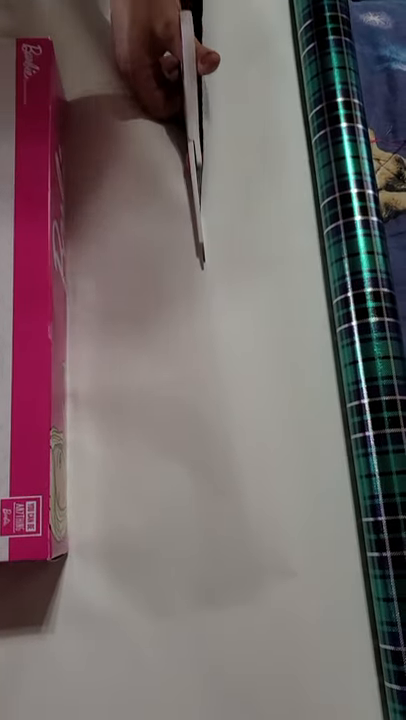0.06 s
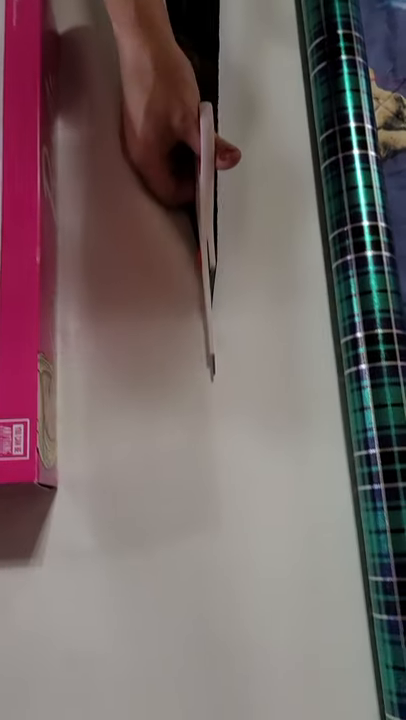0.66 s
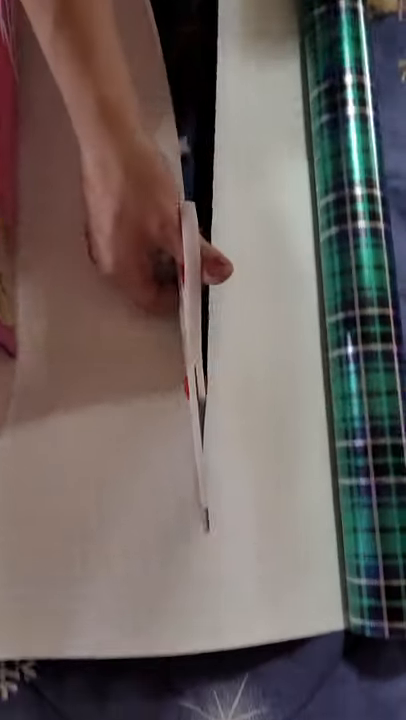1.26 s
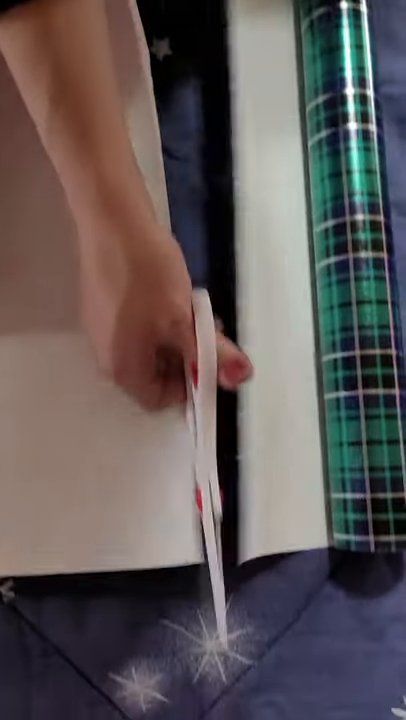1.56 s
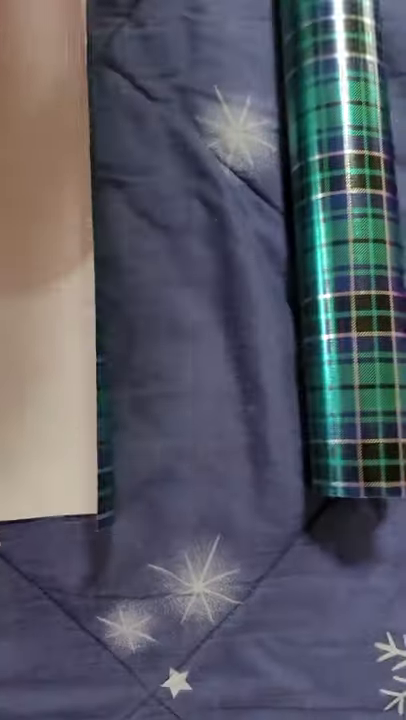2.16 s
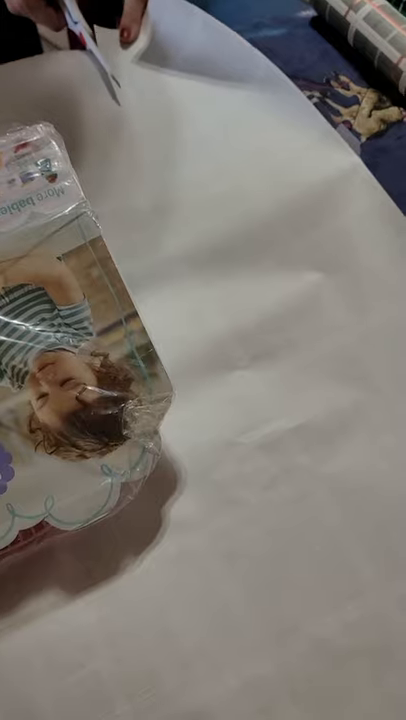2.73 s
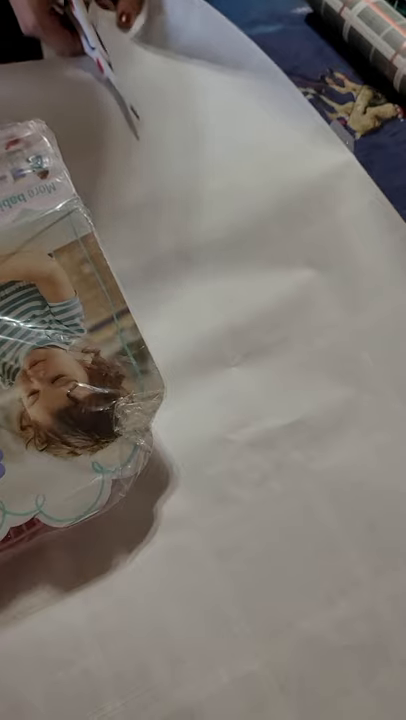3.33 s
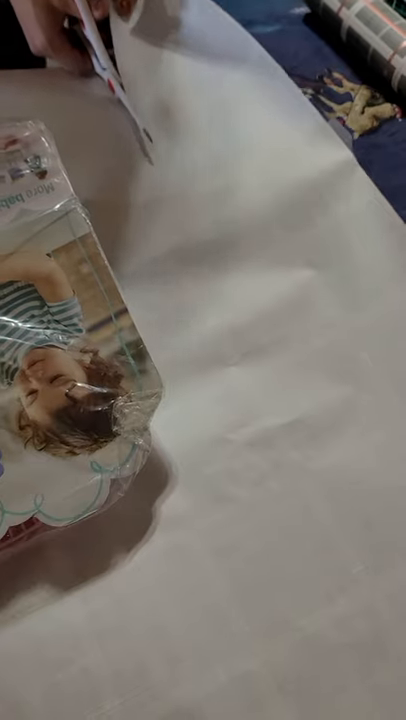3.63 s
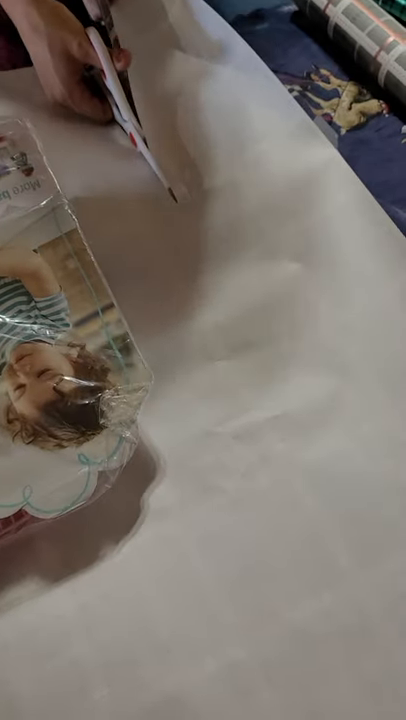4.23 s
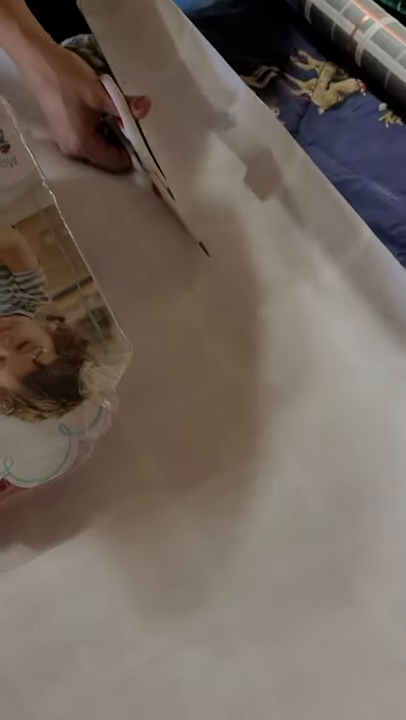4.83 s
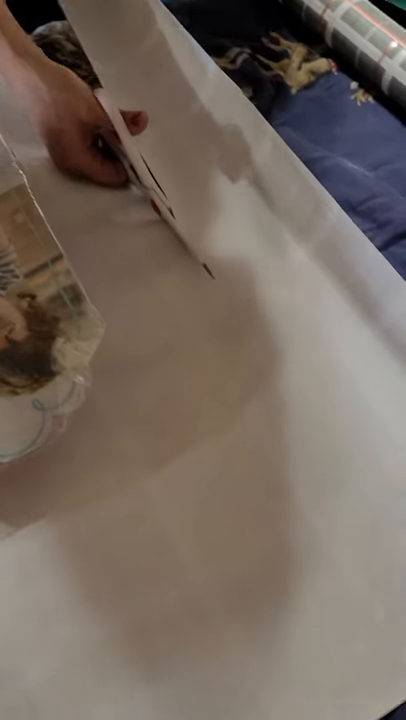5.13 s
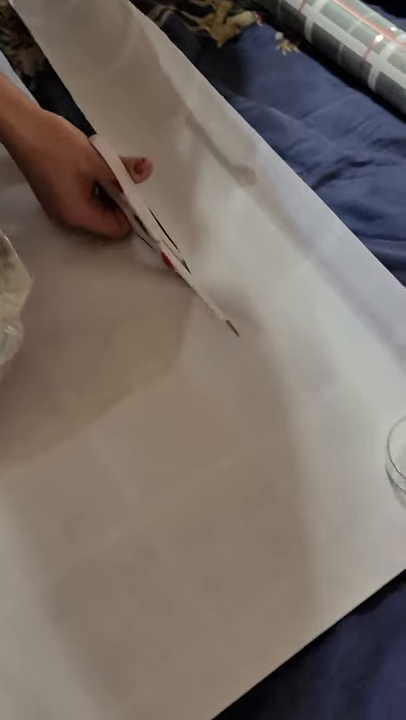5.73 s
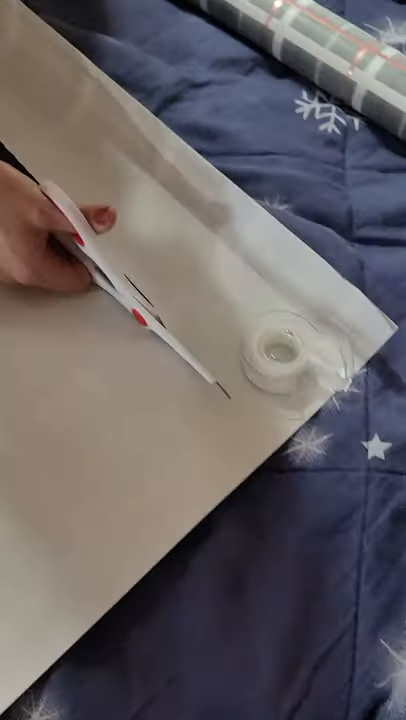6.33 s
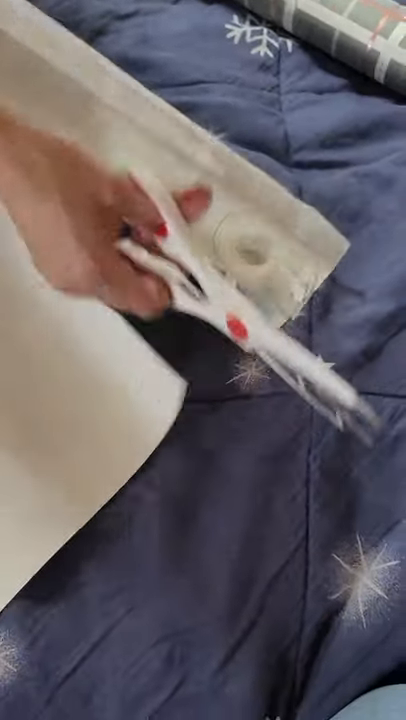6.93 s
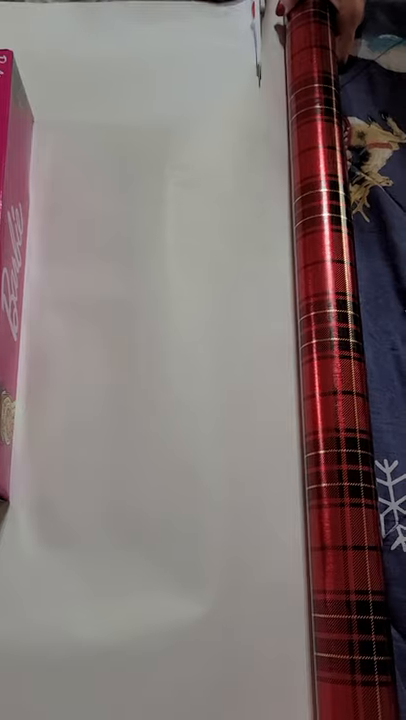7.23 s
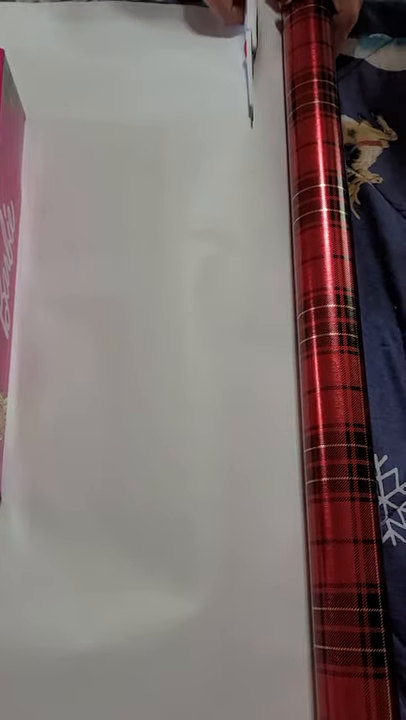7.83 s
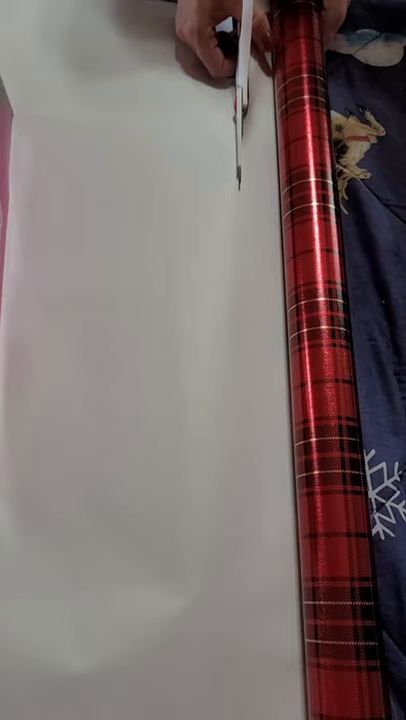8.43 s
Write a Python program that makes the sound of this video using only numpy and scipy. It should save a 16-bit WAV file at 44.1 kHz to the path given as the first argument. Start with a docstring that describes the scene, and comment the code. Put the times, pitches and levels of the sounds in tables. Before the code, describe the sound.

Half-open scissors glide through wrapping paper, heard close in a small quiet room. The first hissing cut grows louder and stops abruptly. After a pause with faint blade ticks, a softer, longer cut snags halfway with sharp clicks and a crackle, then runs on and ends in a clack. The loose paper flaps and slides briefly, and another soft, duller cut begins.

```python
"""Half-open scissors glide through wrapping paper on a quilt in a small quiet room: three long cuts,
the second snagging halfway. The blades snap thousands of fibres a second; the sheet radiates them over
short paths that shift as the scissors travel, so the hiss slowly swirls. Around the cuts the blades clack
and the loose paper slides and flaps; underneath lie a soft rumble of the hand and the room tone."""
import sys
import numpy as np
from scipy import signal
from scipy.fft import rfft, irfft, next_fast_len
from scipy.io import wavfile
from scipy.ndimage import uniform_filter1d

SR = 44100
rng = np.random.default_rng(int(sys.argv[2]) if len(sys.argv) > 2 else 0)


def master(y):
    """Save y as 16-bit WAV."""
    cut = np.clip(np.atleast_2d(y).T, -1, 1)
    pcm = np.round(cut * 32767)  # scale
    wavfile.write(sys.argv[1], SR, pcm.astype(np.int16))


N = 382328

# glides of the scissors, the snag splitting the second cut in two: start_s, end_s
GLIDES = [(0.0, 1.566), (2.531, 4.832), (4.828, 6.671), (7.123, 8.78)]
# push of the hand through each glide, as the level of the sheet: time_s, level_db
PUSH_1 = [(0.0, -34), (0.966, -31), (1.07, -27.5), (1.525, -27.5), (1.55, -25.5)]
PUSH_2 = [(2.55, -39), (2.79, -42.4), (2.92, -40), (3.09, -40.5), (3.49, -42), (3.8, -43.5), (4.04, -42.5),
          (4.2, -40.9), (4.689, -41)]
PUSH_3 = [(4.93, -37.5), (5.38, -38.7), (5.51, -37), (5.86, -36), (6.22, -34.5), (6.34, -32.2), (6.53, -33),
          (6.65, -32.5)]
PUSH_4 = [(7.15, -45), (7.246, -41), (7.356, -44.1), (7.986, -38), (8.66, -37.1)]
# tone colour of the sheet in each glide: frequency_hz, gain_db
SHEET_1 = [(100, -21.5), (280, -23.5), (390, -13), (520, -9), (720, -3), (1020, -4.5), (1250, -1),
           (2300, -5.5), (3600, -3), (5000, -9.5), (7100, -10.5), (8000, -13), (9500, -19), (11400, -16.5),
           (15500, -26.5)]
SHEET_2 = [(100, -10), (190, -4.5), (290, -5.5), (420, -5), (680, 0), (1000, 3), (1350, 2), (2200, 0.5),
           (3300, 2), (4000, -2), (5000, -6), (7000, -6.5), (9500, -24.5), (11400, -25.5), (15500, -31)]
SHEET_3 = [(100, -49), (200, -3), (300, -8.5), (400, -5.5), (520, -4.5), (660, 0), (880, -1.5), (1300, 0.5),
           (1750, 2.5), (2300, 2.5), (3200, -1.5), (4200, -4), (6000, -6.5), (7200, -4.5), (8500, -3.5),
           (9700, -5), (12000, -6.5), (15500, -9)]
SHEET_4 = [(100, -8), (180, -25.5), (270, -13.5), (520, -13), (690, -6.5), (980, -2.5), (1280, 4),
           (1800, -0.5), (2200, -3.5), (2750, -8.5), (3800, -12.5), (4800, -16), (6300, -17.5), (9300, -11),
           (11400, -14), (15500, -18.5)]
# main resonance of the sheet in each glide: time_s, pitch_hz, boost_db, half_width_hz
RING_1 = [(0.0, 1560, 5, 380), (.55, 1410, 5, 350), (.85, 1380, 7, 280), (1.07, 1330, 6, 350),
          (1.25, 1440, 2, 450), (1.55, 1500, 3.5, 522)]
RING_2 = [(2.55, 1430, 5.9, 300), (2.8, 1390, 6.3, 230), (3.05, 1680, 8.5, 300), (3.45, 1690, 8.2, 260),
          (3.95, 1910, 1.5, 200), (4.55, 1760, 5.2, 150)]
RING_3 = [(4.85, 1450, 6.6, 330), (5.15, 1620, 5.5, 380), (5.35, 1170, 4.5, 180), (5.68, 1230, 4, 180),
          (5.88, 1370, 8.3, 190), (6.3, 1350, 8.2, 180), (6.54, 1340, 13.7, 180), (6.66, 1260, 8, 181)]
RING_4 = [(7.13, 1720, 9.7, 240), (7.6, 1630, 7.4, 260), (8.0, 1620, 6.1, 282), (8.66, 1320, 1.6, 330)]
# treble over the sheet's level, arching once and drifting in each glide:
# rasp_db, fizz_db, arch_db, rasp_drift_db, fizz_drift_db
TREBLE = [(-2.5, -8, -1, -2, 0), (-3.5, -10.5, 7.5, 3.5, 13), (-4, -8, 3, -0.5, 1), (-1, -10, -5, -2.5, -2)]
# direction of the scissors in each glide (positive pan is left):
# first_left_lead_ms, last_left_lead_ms, pan_db, midway_swing_db, extra_fizz_pan_db
AIM = [(-.06, .09, 1.5, -12, 0.5), (0.22, 0.17, 1, 0, 4.5), (.18, 0.15, -0.2, 3.5, 3.5),
       (0.2, 0.15, 3, -4.5, 0.5)]
# paper resonances by the blades: start_s, length_s, pitch_hz, sink_octaves_per_s, half_width_hz, boost_db
SWISHES = [(0.355, 0.81, 6330, 0.48, 620, 6), (0.715, 0.39, 7530, 0.64, 450, 9),
           (.92, 0.45, 14200, 1.2, 1000, 4), (1.02, 0.15, 5800, .4, 600, 6),
           (1.112, 0.42, 1930, -0.3, 560, 8), (2.864, 2.3, 2800, 0.26, 191, 6),
           (2.855, 0.61, 3320, 0.016, 280, 7), (2.848, 0.6, 4140, 0.15, 250, 4.5),
           (3.53, 0.385, 5170, 1.13, 500, 9.5), (3.448, 1.0, 6930, -0.024, 320, 6),
           (3.85, 0.47, 5760, 0.17, 400, 7.5), (3.948, 0.85, 8300, 0.14, 450, 0),
           (4.252, 0.25, 4220, 0.15, 197, 4.5), (4.255, 0.13, 687, -0.076, 80, 8.5),
           (4.424, 0.3, 2530, 0.31, 170, 3), (4.858, 0.76, 5550, -0.29, 330, 6),
           (5.42, 0.13, 2060, 0.078, 260, 6.5), (5.347, 0.99, 8600, 0.076, 550, 5),
           (5.628, 0.48, 630, 0.17, 111, 6), (5.637, 0.7, 2160, -0.16, 150, 6),
           (5.73, 0.92, 3040, -0.06, 300, 4.5), (6.274, 0.28, 2330, 0.36, 290, 9),
           (6.25, 0.74, 6000, 0.099, 450, 3), (7.088, 0.4, 3520, -0.4, 705, 5.5),
           (7.745, 1.1, 6600, 0.26, 930, 8.5)]
# blades knocking and catching: start_s, level_db, pitch_hz, t60_s, pan_db
CLACKS = [(2.086, -61, 6000, .02, 4), (2.137, -53, 2780, 0.023, 5), (2.355, -58, 4520, 0.018, 2),
          (4.7116, -21, 4600, 0.006, 7), (4.724, -18, 5100, 0.019, 0), (4.831, -17.5, 3100, 0.017, 4),
          (6.662, -25, 1590, 0.016, 1), (6.883, -39, 3150, 0.0049, -3), (6.92, -35.5, 4000, 0.018, 3),
          (7.549, -27.5, 2510, 0.0089, 1)]
# paper buckling and flapping: start_s, level_db, pitch_hz, t60_s, pan_db
FLAPS = [(1.01, -31, 630, 0.32, 2), (1.055, -21, 1090, 0.074, 2), (1.764, -55, 1000, 0.044, -5),
         (4.715, -33, 4970, 0.11, 4), (4.723, -31, 2180, 0.32, -6), (4.828, -25.5, 940, 0.022, 8),
         (4.839, -22.5, 2100, 0.019, 0), (6.804, -36.5, 1630, 0.068, 0), (6.847, -36, 1830, 0.054, 1),
         (6.873, -36, 1930, 0.04, -5), (6.918, -32.5, 1100, 0.04, 4)]
# freed paper sliding over the quilt: start_s, hold_s, level_db
SLIDES = [(1.564, 0.048, -47.5), (6.661, 0.0081, -35), (6.725, 0.26, -52.5), (6.84, 0.03, -48.5),
          (7.064, 0.034, -54)]
# tone colour of the sliding strip: frequency_hz, gain_db
STRIP_COLOUR = [(60, -11), (300, -4), (800, -3.5), (1100, -5), (1360, 6.5), (1700, 1), (3000, -3.5),
                (7000, -8), (10000, -14), (16000, -23)]
# the hand on the quilt: start_s, length_s, level_db, cutoff_hz
BUMPS = [(2.534, 4.1, -60.5, 99), (6.611, 0.123, -54, 34.7)]
# decay of the room: frequency_hz, t60_s
ROOM_T60 = [(200, 0.22), (1500, 0.34), (4000, 0.31), (14000, 0.048)]
# colour of the room tone: frequency_hz, gain_db
ROOM_COLOUR = [(12, -40.5), (20, -16.5), (86, 5), (130, -7), (146, -15.5), (210, -17), (499, -21.5),
               (698, -10), (873, -14.5), (1000, -26.5), (1660, -21), (2820, -31), (4400, -33),
               (16000, -39.5)]

FRAMES = dict(nperseg=1024, noverlap=768)
HZ = np.fft.rfftfreq(1024, 1 / SR)
CUT_ATTACK_S, CUT_RELEASE_S = 0.00041, 0.0049  # the blades bite at once and run out at the sheet's edge
SNAG_S, FREE_S, SNAG_DB, SNAG_EASE_S = 4.712, 4.85, 3.0, 0.05
FIZZ_ARCH, FIZZ_SNAG = 0.93, 0.23  # the fizz's share of the arch and its extra share of the snag
SHEET_SWING = 0.42  # share of the pan swing that the sheet's long waves follow


def scissor_glide(glide, colour, ring, clump_db):
    """Snapping fibres drive three bands: the body of the sheet, the blades' rasp and a fine fizz."""
    (start, end), push, treble, (first_ms, last_ms, pan_db, swing_db, fizz_pan_db) = glide
    rasp_db, fizz_db, arch_db, rasp_drift_db, fizz_drift_db = treble
    t = np.arange(start, end, 1 / SR)
    travel = (t - start) / (end - start)
    arch = np.sin(np.pi * travel)
    sheet_db = np.interp(t, *np.transpose(push)) + snag(t)
    rasp_db = rasp_db + arch_db * arch + rasp_drift_db * (travel - .5)
    fizz_db = fizz_db + FIZZ_ARCH * arch_db * arch + fizz_drift_db * (travel - .5) + FIZZ_SNAG * snag(t)
    snaps = fibres(len(t), per_s=5000, clump_db=clump_db, clump_hz=256, rub=0.4)
    rubbing = rng.standard_normal((2, len(t)))  # parted edges on the blades, different on each side
    _, frame_s, spectra = signal.stft(np.vstack([snaps, rubbing]), SR, **FRAMES)
    frame_s, hz = frame_s + start, HZ[:, None]
    lead_ms = first_ms + (last_ms - first_ms) * np.interp(frame_s, t, travel)
    drive = spectra[0] + spectra[1:] * hz / (hz + 900)
    swirl = drive * sheet_paths(frame_s, lead_ms) * bending_waves(frame_s, hz)
    paper = swirl * sheet_tone(frame_s, hz, colour, ring)
    below_rasp, below_fizz = 1 / (1 + (hz / 2600) ** 10), 1 / (1 + (hz / 8000) ** 20)
    # the shorter the waves, the more the far microphone is shaded
    bands = [(below_rasp, sheet_db, pan_db + SHEET_SWING * swing_db * arch),
             (below_fizz - below_rasp, sheet_db + rasp_db, pan_db + swing_db * arch),
             (1 - below_fizz, sheet_db + fizz_db, pan_db + swing_db * arch + fizz_pan_db)]
    out = np.zeros((2, len(t)))
    for share, level_db, side_db in bands:
        band = signal.istft(paper * share, **FRAMES)[1][:, :len(t)]
        # the paths recolour each band, the push of the hand sets its strength
        power = uniform_filter1d(band.mean(0) ** 2, size=8000)
        out += band / np.sqrt(power + 1e-20) * amp([level_db + side_db / 2, level_db - side_db / 2])
    fades = np.minimum((t - t[0]) / CUT_ATTACK_S, (t[-1] - t) / CUT_RELEASE_S)
    return start, out * np.clip(fades, 0, 1)


def fibres(size, per_s, clump_db, clump_hz, rub):
    """Fibres snap in clumps, a few of them loud, over a smooth rubbing noise."""
    strength = amp(3.2 * np.minimum(rng.exponential(1, size), 3))
    snaps = (rng.random(size) < per_s / SR) * rng.choice([-1, 1], size) * strength
    return (unit(snaps) + rub * rng.standard_normal(size)) * amp(clump_db * wander(size, clump_hz))


def snag(t):
    """The hand's extra push in dB: held while the blades are caught, easing off once they are free."""
    return SNAG_DB * (t > SNAG_S) * np.exp(-np.maximum(t - FREE_S, 0) / SNAG_EASE_S)


def sheet_paths(t, lead_ms, stretch_per_s=0.14, flex_ms=0.078, max_flex_hz=4.15, count=10):
    """Direct sound plus glances off the flexing sheet; they lengthen with the cut, so their combs sink."""
    hz = HZ[:, None]
    from_middle_s = (t - t.mean())[None]
    glances = np.zeros((2, len(HZ), len(t)), complex)
    for side in range(2):
        for base_ms in np.geomspace(.45, 4, count):
            jitter, speed, sway, phase = rng.random(4)
            flex = flex_ms * np.sin(2 * np.pi * (max_flex_hz * sway * from_middle_s + phase))
            path_ms = base_ms * np.exp(0.1937 * jitter + stretch_per_s * (speed + .5) * from_middle_s)
            glances[side] += rng.choice([-1, 1]) * np.exp(-2j * np.pi * hz * (path_ms + flex) / 1000)
    direct = np.exp(1j * np.pi * hz * np.array([lead_ms, -lead_ms])[:, None] / 1000)
    # long waves pass the folds of the paper unscattered
    return direct + low_cut(hz, 2156) * glances / np.sqrt(count)


def bending_waves(t, hz, reach_hz=750, count=4):
    """Slow bending waves return from the sheet's edges: hollow low resonances that drift as it flexes."""
    sways, phases = rng.random((2, count))
    echoes = 0
    for echo_s, sway, phase in zip(np.geomspace(.004, .012, count), sways, phases):
        flex = 1 + 0.16 * np.sin(2 * np.pi * (.5 * sway * t + phase))
        echoes = echoes + np.exp(-2j * np.pi * hz * echo_s * flex)
    return 1 + echoes / np.sqrt(count) / (1 + (hz / reach_hz) ** 2)


def sheet_tone(t, hz, colour, ring):
    """The sheet's EQ: colour, swishes, sheen and a ring that moves as the free paper changes length."""
    ring_s, *columns = np.transpose(ring)
    pitch_hz, boost_db, half_width_hz = (np.interp(t, ring_s, column) for column in columns)
    lift_db = boost_db * bell(hz, pitch_hz, half_width_hz) + swishes(t, hz) + sheen(t)
    return amp(curve(colour, hz) + lift_db) * low_cut(hz, 55)


def swishes(t, hz):
    """Lift in dB as the paper resonates near the blades: each peak swells, glides (mostly down), fades."""
    lift_db = 0
    for start, length, pitch_hz, sink, half_width_hz, boost_db in SWISHES:
        age = np.clip(t - start, 0, length)
        swell = abs(np.sin(np.pi * age / length)) ** 0.15  # opens quickly and holds
        lift_db = lift_db + boost_db * swell * bell(hz, pitch_hz * 2 ** (-sink * age), half_width_hz)
    return lift_db


def sheen(t, depth_db=1.6, width_hz=560, life_s=0.16):
    """Bright and dull patches in the treble, in dB, coming and going as the sheet flexes."""
    patches = rng.standard_normal((len(HZ), len(t)))
    for _ in range(2):
        patches = uniform_filter1d(patches, int(width_hz / HZ[1]), axis=0)
        patches = uniform_filter1d(patches, int(life_s / (t[1] - t[0])), axis=1)
    return depth_db * unit(patches) * low_cut(HZ, 3000)[:, None]


def blade_clack(row):
    """The blades knock or catch: a sharp, wide click."""
    return burst(*row, rise_s=.0001, shared=0.057)


def paper_flap(row):
    """The paper buckles or flaps: a softer attack, narrower in stereo."""
    return burst(*row, rise_s=0.011, shared=0.62)


def burst(start_s, level_db, pitch_hz, t60_s, pan_db, rise_s, shared):
    """Noise through one broad resonance, swelling and dying away."""
    t = np.arange(SR // 5) / SR
    common, *own = rng.standard_normal((3, len(t)))
    envelope = (1 - np.exp(-t / rise_s)) * amp(-60 * t / t60_s)
    noise = shared * common + np.sqrt(1 - shared ** 2) * np.array(own)
    noise = unit(tint(noise, lambda f: ((f + 1) / pitch_hz + pitch_hz / (f + 1)) ** -3.5))
    pan = amp([[pan_db / 2], [-pan_db / 2]])
    return start_s, noise * envelope / envelope.max() * amp(level_db) * pan


def strip_slide(start_s, hold_s, level_db, attack_s=0.0034, fade_db_per_s=268):
    """The loose strip rustles as it slides, then comes to rest."""
    t = np.arange(SR // 2) / SR
    envelope = np.minimum(t / attack_s, 1) * amp(level_db - fade_db_per_s * np.maximum(t - hold_s, 0))
    grains = np.array([fibres(len(t), per_s=1700, clump_db=3.0, clump_hz=60, rub=0.61) for _ in range(2)])
    rustle = tint(grains + 0.092 * grains[::-1], lambda f: amp(curve(STRIP_COLOUR, f)))
    return start_s, unit(rustle) * envelope


def hand_bump(start_s, length_s, level_db, cutoff_hz):
    """The hand presses into the quilt or drags over it: a soft low rumble."""
    size = int(length_s * SR)
    rumble = unit(tint(rng.standard_normal(size), lambda f: f / (1 + (f / cutoff_hz) ** 4)))
    rumble *= signal.windows.tukey(size, .25) * amp(level_db)
    return start_s, np.array([rumble, rumble])


def room_reverb(x):
    """Sparse reflections, each band dying at its own speed."""
    taps = rng.choice([-1., 1.], (2, SR // 2)) * (rng.random((2, SR // 2)) < 3000 / SR)
    taps[:, :int(.005 * SR)] = 0  # pre-delay
    hz, t, spectra = signal.stft(taps, SR, nperseg=256)
    decay = amp(-60 * t / curve(ROOM_T60, hz)[:, None])
    tail = signal.istft(spectra * decay, SR, nperseg=256)[1]
    return signal.fftconvolve(x, tail / np.linalg.norm(tail[0]), axes=1)[:, :N]


def room_tone(level_db):
    """A centred rumble under a faint, wide hiss."""
    common, *own = rng.standard_normal((3, N))
    rumble = tint(common, lambda f: 1 / np.hypot(1, f / 600))
    hiss = tint(np.array(own), lambda f: f / np.hypot(f, 600))
    return unit(tint(rumble + hiss, lambda f: amp(curve(ROOM_COLOUR, f)))) * amp(level_db)


def amp(db):
    """Decibels to gain."""
    return 10 ** (np.asarray(db) / 20)


def unit(x):
    """Scales to rms 1."""
    return x / np.sqrt(np.mean(x ** 2) + 1e-20)


def curve(points, hz):
    """Reads a table on a log-frequency axis."""
    f, value = np.transpose(points)
    return np.interp(np.log(hz + 1), np.log(f + 1), value)


def bell(hz, centre_hz, half_width_hz):
    """A resonant peak: 1 at its centre, one half at half_width_hz to either side."""
    return .5 ** (((hz - centre_hz) / half_width_hz) ** 2)


def low_cut(hz, corner_hz):
    """Gain that rolls off below the corner."""
    return hz ** 2 / (hz ** 2 + corner_hz ** 2)


def tint(x, gain):
    """Filters by gain, a function of frequency."""
    size = next_fast_len(x.shape[-1])
    return irfft(rfft(x, size) * gain(np.fft.rfftfreq(size, 1 / SR)), size)[..., :x.shape[-1]]


def wander(size, rate_hz):
    """Smooth random motion of rms 1."""
    return unit(tint(rng.standard_normal(size), lambda f: 1 / (1 + (f / rate_hz) ** 2)))


def add(mix, start_s, sound):
    """Lays a stereo sound into the mix."""
    part = mix[:, max(round(start_s * SR), 0):][:, :sound.shape[1]]
    part += sound[:, :part.shape[1]]


def scene():
    """The cuts and the handling around them, in the room."""
    dry = np.zeros((2, N))
    first, up_to_snag, after_snag, last = zip(GLIDES, [PUSH_1, PUSH_2, PUSH_3, PUSH_4], TREBLE, AIM)
    add(dry, *scissor_glide(first, SHEET_1, RING_1, clump_db=0.55))
    add(dry, *scissor_glide(up_to_snag, SHEET_2, RING_2, clump_db=1.24))
    add(dry, *scissor_glide(after_snag, SHEET_3, RING_3, clump_db=0.8))
    add(dry, *scissor_glide(last, SHEET_4, RING_4, clump_db=1.8))
    for row in CLACKS:
        add(dry, *blade_clack(row))
    for row in FLAPS:
        add(dry, *paper_flap(row))
    for row in BUMPS:
        add(dry, *hand_bump(*row))
    for row in SLIDES:
        add(dry, *strip_slide(*row))
    return dry + amp(-16.5) * room_reverb(dry) + room_tone(level_db=-63)


def record(dry):
    """The right microphone port notches the treble; a steep low-pass trims the top of both sides."""
    right = tint(dry[1], lambda f: amp(-11 / (1 + ((f - 8100) / 380) ** 2)))
    low_pass = signal.firwin(801, 15950, window=("kaiser", 9), fs=SR)
    return signal.oaconvolve(np.array([dry[0], right]), low_pass[None], "same", axes=1)


dry = scene()
out = record(dry)
master(out)
```